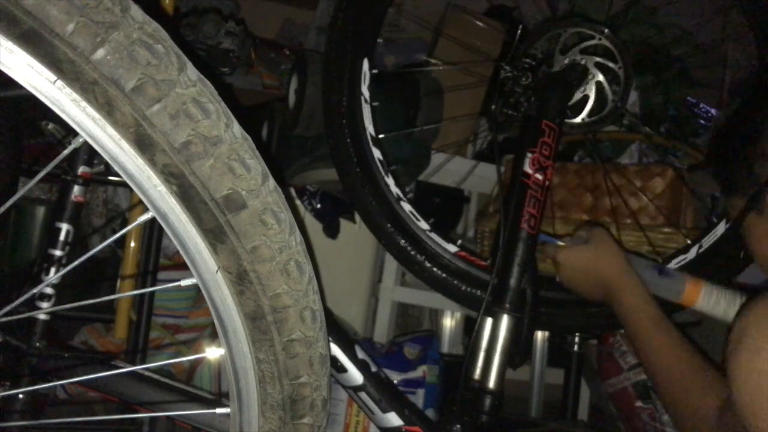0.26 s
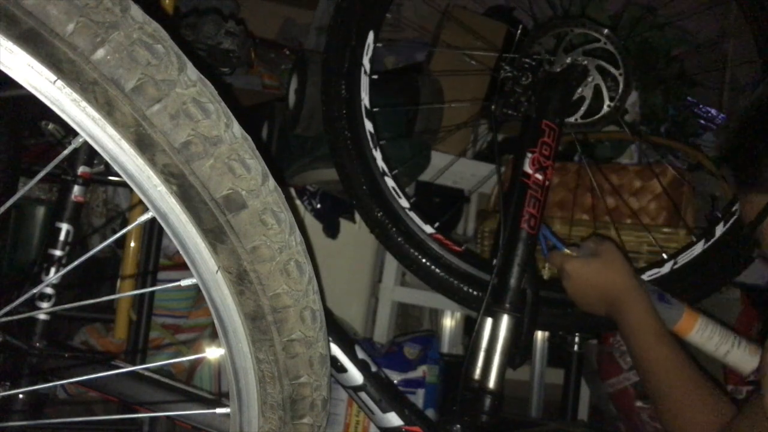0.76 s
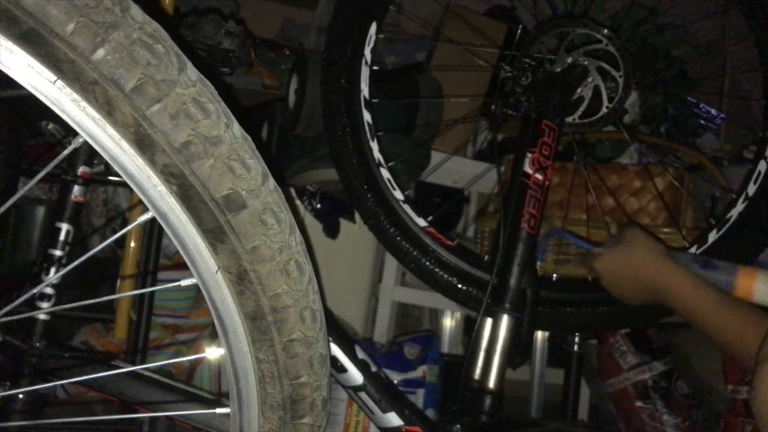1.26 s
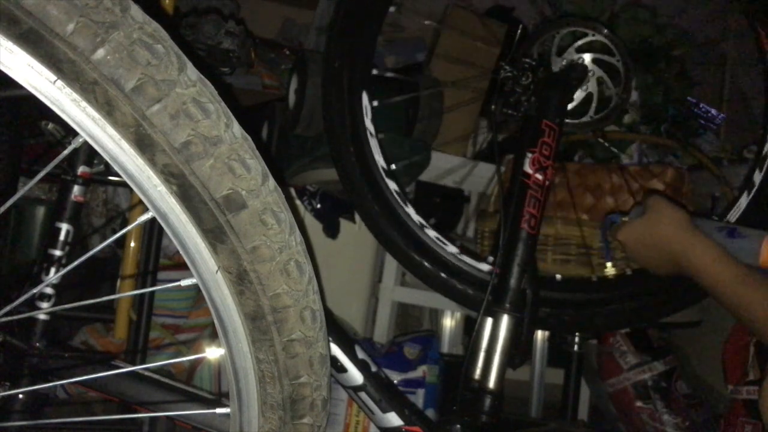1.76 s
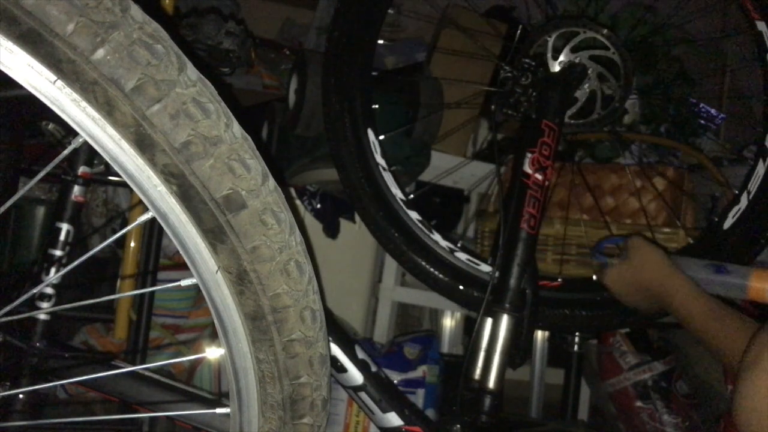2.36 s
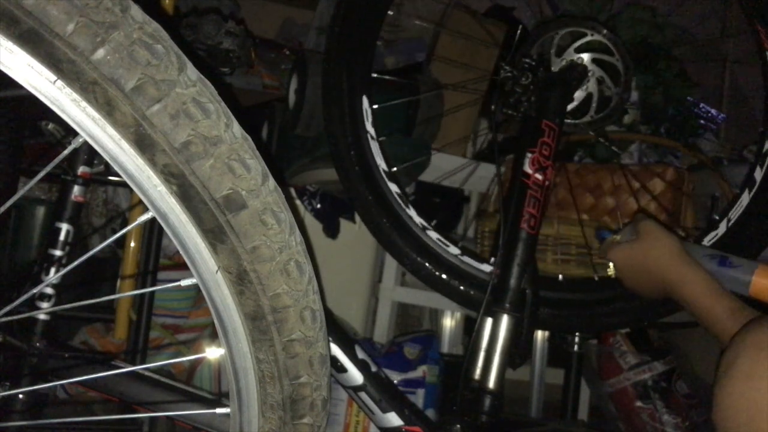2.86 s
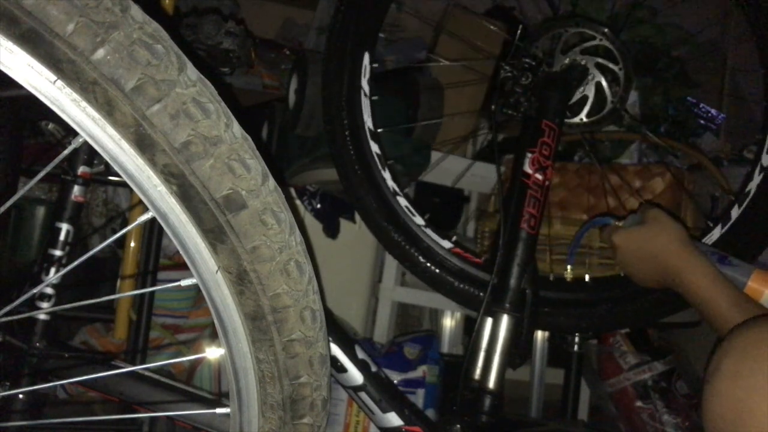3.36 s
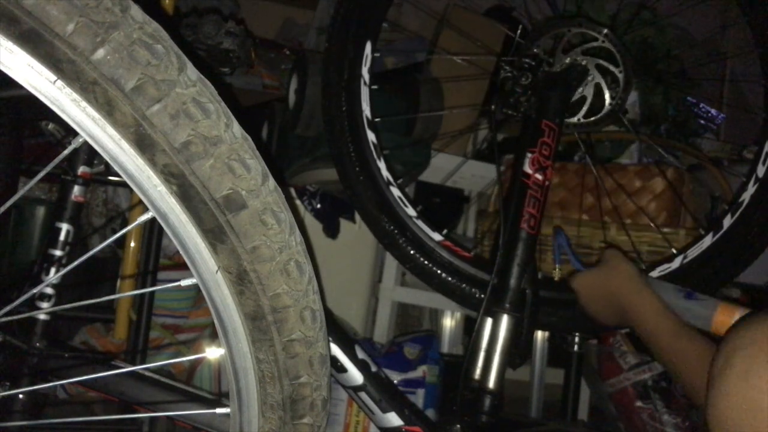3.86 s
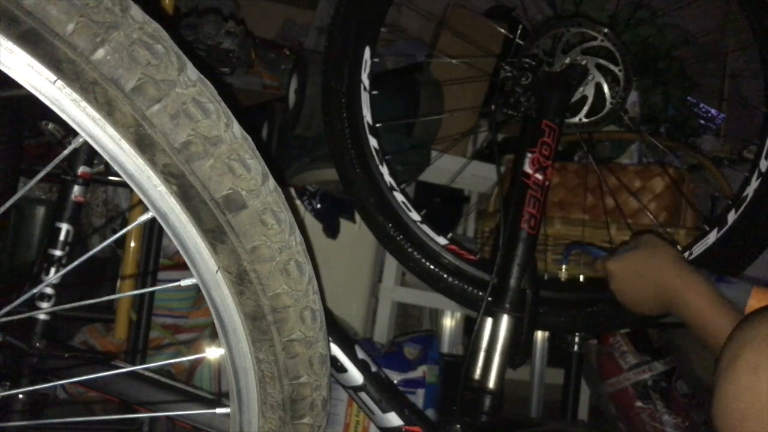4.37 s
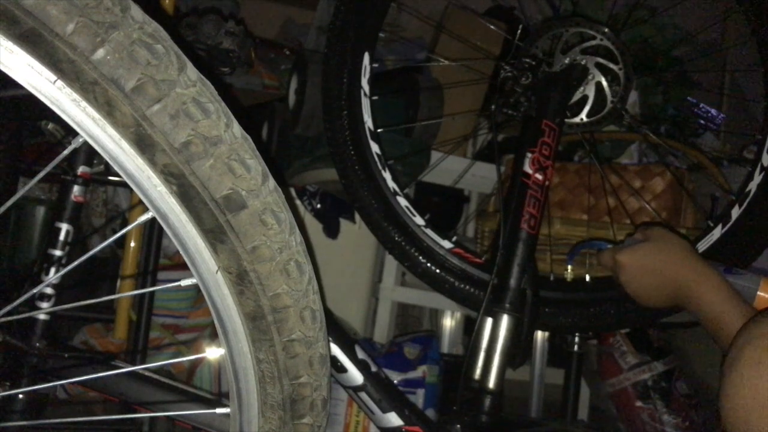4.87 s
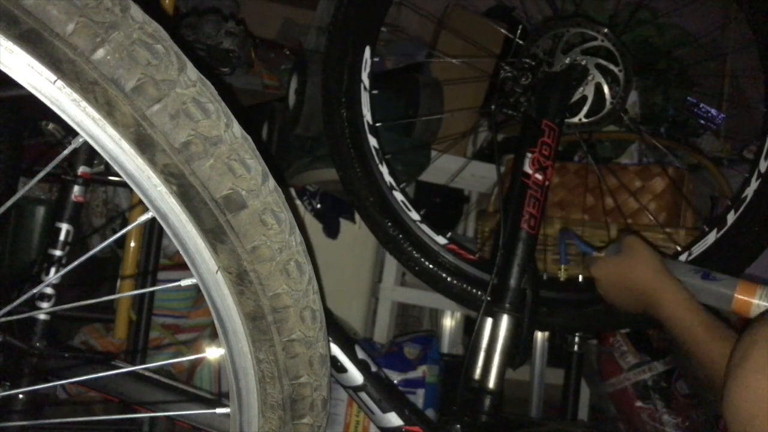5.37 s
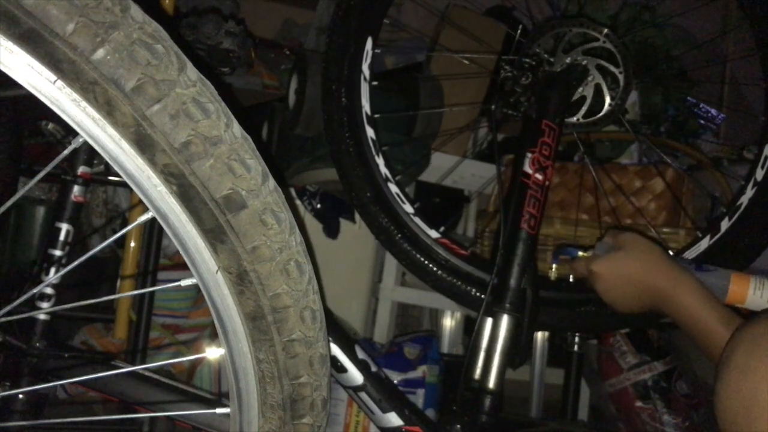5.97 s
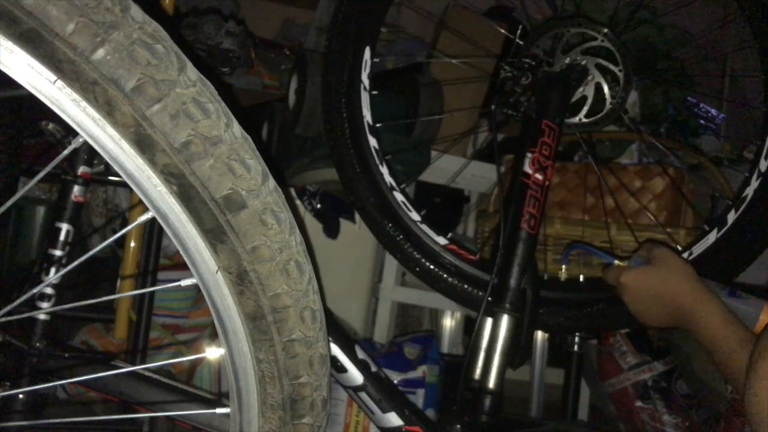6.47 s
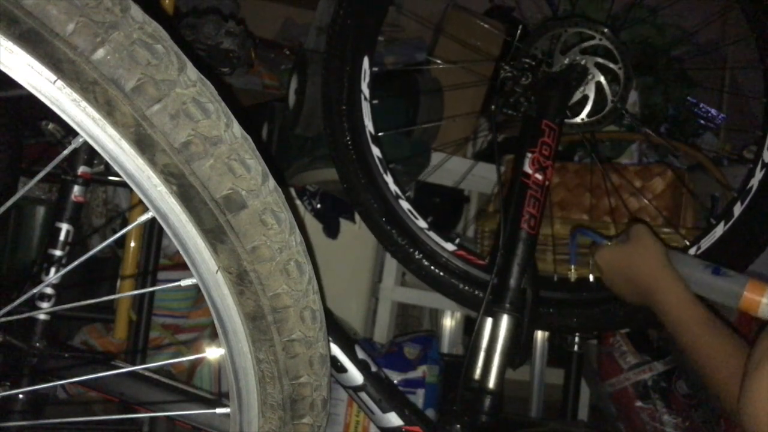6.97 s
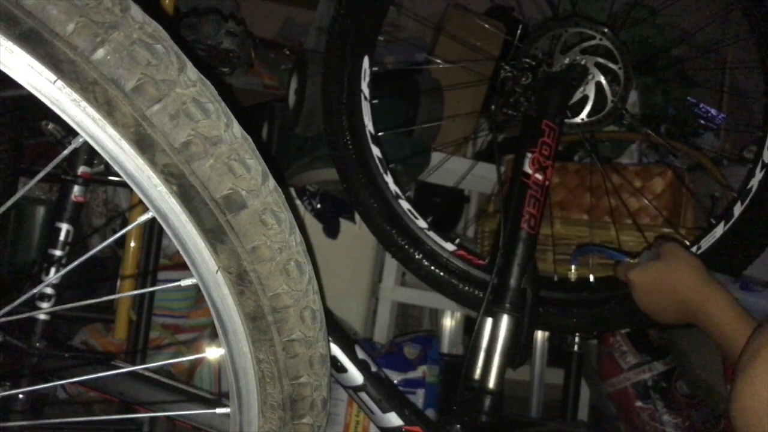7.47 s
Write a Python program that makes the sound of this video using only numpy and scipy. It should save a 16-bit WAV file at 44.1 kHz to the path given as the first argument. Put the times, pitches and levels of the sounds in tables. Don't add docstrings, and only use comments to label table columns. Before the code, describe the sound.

In a small garage with a short ring and a faint low boom of far traffic, a hand pump works close by on a bicycle tyre valve. At 0 s it is already mid-push: hard jerky knocks in the barrel, a short airy drone, then a bright metallic puff by 0.09 s. Air hisses and whistles from 0.16 s as the handle returns; around 0.35 to 0.7 s wind buffets the microphone, fluttering and humming low and hollow, fading by 1.5 s. A slow fizzing pull follows from 1.3 to 2.2 s with small ticks. More stuttering pushes land near 2.5, 3.9, 5.25 and 6.9 s, mostly ending in sharp valve snaps; the third ends more weakly. Between them come thin hiss and fizz, skin rubbing metal and loose-part ticks. Dry lever clicks sound at 4.3 s and in clusters around 6.0 and 6.6 s. A faint last leak runs to about 7.8 s.

```python
import sys
import numpy as np
from scipy import signal
from scipy.fft import rfft, irfft, next_fast_len
from scipy.io import wavfile
from scipy.ndimage import uniform_filter1d, map_coordinates

SR = 44100
rng = np.random.default_rng(int(sys.argv[2]) if len(sys.argv) > 2 else 0)


def to_linear_factor(level_db):
    exponent = np.asarray(level_db, float) / 20
    return 10 ** exponent


def transcribe(u):
    v = np.clip(np.atleast_2d(u).T, -1, 1)
    q = np.round(v * 32767).astype(np.int16)
    wavfile.write(sys.argv[1], SR, q)


N = 340887
STEP = 32
HARD_DB = -15

# [f/Hz, time to fall 60 dB/s]
GARAGE_FADE = [(300, 0.38), (2000, 0.23), (6000, 0.27), (14000, 0.19)]
# [t/s, level/dB]
TRAFFIC_LEVEL = [(1.5, -50), (4.54, -51.5), (4.57, -50), (6.91, -52.5), (7.03, -48), (7.42, -54.5),
                 (7.73, -50.5)]
# [f/Hz, level/dB]
TRAFFIC_COLOUR = [(12, -57), (20, -50.5), (54, 4.5), (80, 5.5), (101, -1.5), (206, -15.5), (400, -20.5),
                  (520, -33), (880, -120)]
# [f/Hz, level/dB]
ROOM_AIR_COLOUR = [(200, -23.5), (650, -3.5), (930, -8), (1800, -13.5), (4000, -15.5), (8000, -16.5),
                   (12000, -21), (15800, -14.5)]
# [t/s, peak
# level/dB, 20 dB rise/s, 20 dB fall/s, dull part level/dB]
STROKES = [(0, -32.5, 0.045, 0.08, -19), (0.299, -49.5, 0.3, 0.21, -8.5), (0.631, -50, .003, 0.048, -15),
           (.662, -54, .003, 0.11, 5), (0.926, -51.5, 0.003, 0.14, -8), (1.416, -53.5, 0.17, 0.068, -10),
           (1.8, -65, 1, 0.63, -5.5), (2.167, -54.5, 0.064, 0.057, 5), (2.353, -56, 0.0026, 0.017, 15.5),
           (2.7, -65, 0.64, 0.04, -8), (2.766, -54.5, 0.017, 0.25, -4), (2.84, -56.5, .1, 0.037, -15),
           (3.1, -64, 0.11, 0.32, -2), (3.594, -64, 0.13, 0.072, -5.5), (3.863, -51, 0.025, 0.036, -10),
           (3.965, -42, 0.044, 0.077, -24), (4.192, -57.5, 0.81, 0.27, -9), (4.66, -66, 0.24, 0.77, -7),
           (5.2, -48, 0.13, 0.14, -2.5), (5.52, -49, 0.13, 0.07, -9), (5.62, -66.5, 0.14, 1.3, -4.5),
           (6.55, -64.5, 0.083, 0.14, -5.5), (6.708, -54, 0.027, 0.12, -6), (6.87, -57, 0.1, 0.44, -0.5),
           (7.17, -56.5, 0.092, 0.27, -31)]
# [f/Hz, level/dB]
SKIN_COLOUR = [(530, -28.5), (900, 0), (3300, -4), (3780, -7), (4340, -6), (4970, -7.5), (8000, -11.5),
               (10400, -18.5), (17600, -120)]
# [f/Hz, level/dB]
PALM_COLOUR = [(120, -8), (250, -7), (700, -2.5), (1200, -17)]
# [t/s, peak level/dB, top level/dB, barrel level/dB]
SNAPS = [(0, -38.5, -8, -21), (0.0616, -22.5, -14, -10), (0.083, -21.5, -9, -6.5),
         (0.0868, -14, -18, -21.5), (2.615, -20.5, -19, -15), (2.6279, -20.5, -10, -6.5),
         (2.630, -17.5, -7.5, -8.5), (3.622, -37, -35, -36), (3.8252, -34.5, -29, -23),
         (4.076, -41, -30, -28), (5.320, -22, -21, -19), (5.3314, -24.5, -13, -3), (5.334, -22, -7.5, -2.5),
         (6.993, -17.5, -16, -11), (6.998, -21.5, -4.5, -23)]
# [f/Hz, level/dB]
JET_COLOUR = [(4000, -30), (5400, 5.5), (7000, 0.5), (9500, 6), (11500, -12.5)]
# [f/Hz, level/dB]
JET_TOP_COLOUR = [(8500, -29.5), (11000, 2), (13500, 0.5), (16500, -1)]
# [f/Hz, width/Hz, level/dB]
VALVE_MODES = [(1400, 37, -9.5), (2650, 62, -8), (4050, 36, -4), (5572, 54, 5), (6420, 36, 4.5),
               (7070, 81, 4.5), (8700, 45, 1.5), (10000, 68, 4.5), (11140, 54, -3), (11700, 54, -1),
               (13000, 80, -3.5)]
# [t/s, peak level/dB, edge level/dB, barrel pitch f/Hz]
JERKS = [(.0075, -16.5, -13, 3800), (0.03, -15, -18, 4630), (2.349, -34, -30, 2430),
         (2.478, -36, -36, 2650), (2.4955, -28.5, -34, 2620), (2.514, -16, -14.5, 3350),
         (2.548, -17, -11.5, 2960), (2.5754, -13.5, -19, 4200), (3.801, -38.5, -30, 1800),
         (3.851, -34.5, -3, 6300), (3.872, -16, -15, 2530), (3.9013, -14, -13.5, 3880),
         (3.9288, -18.5, -11, 5830), (5.212, -13, -15, 2520), (5.235, -12.5, -19, 2530),
         (5.2543, -14.5, -15, 1970), (5.277, -14, -16, 4050), (6.702, -44, -16, 1400),
         (6.711, -39, -17, 1400), (6.880, -15, -13, 3670), (6.9078, -14, -17, 4600),
         (6.936, -16, -13.5, 2040), (6.983, -16.5, -17, 3550)]
# [f/Hz, level/dB]
BARREL_COLOUR = [(400, -11), (750, -4), (1250, 0), (1700, 2.5), (2510, 7.5), (4560, 2), (4950, 4),
                 (5580, -19), (6350, -0.5), (9000, -12), (11700, -48.5), (19800, -120)]
# [f/Hz, width/Hz, level/dB]
BARREL_MODES = [(700, 140, -11.5), (1300, 110, -6), (1880, 74, -10), (2250, 50, 4.5), (2480, 44, 3),
                (2610, 76, 4), (3550, 200, -1.5), (4390, 120, 9.5), (5570, 490, 3.5)]
# [f/Hz, level/dB]
EDGE_COLOUR = [(5000, -11), (8000, -2.5), (12500, -6.5), (16500, -10.5)]
# [f/Hz, level/dB]
THUD_COLOUR = [(100, -14.5), (220, 3.5), (480, -12), (1100, 0), (2000, -26)]
# [t/s, peak level/dB, pitch f/Hz]
KNOCKS = [
    (.0075, -41, 700),
    (2.351, -38.5, 950),
    (2.352, -48, 200),
    (2.407, -53.5, 700),
    (2.52, -34.5, 890),
    (2.578, -32.5, 820),
    (2.591, -41, 700),
    (4.076, -44, 189),
]
# [f/Hz, level/dB]
KNUCKLE_COLOUR = [(80, 1.5), (190, 1.5), (400, -5.5), (900, -29.5)]
# [t/s, level/dB, hold/s, upper mode f/Hz]
DRONES = [
    (0.034, -39, 0.039, 1490),
    (2.582, -39, 0.03, 1820),
    (3.918, -42, 0.046, 1800),
    (5.271, -37.5, 0.042, 1510),
    (6.944, -37, 0.038, 1810),
]
# [t/s, peak level/dB, pitch f/Hz]
TICKS = [(0.088, -17, 3000), (.496, -29, 3400), (1.339, -42.5, 1920), (1.351, -36.5, 3620),
         (1.3961, -41, 1980), (1.4057, -35, 2240), (1.418, -31, 3400), (1.423, -33, 2350),
         (1.452, -31, 4500), (1.6924, -42, 3500), (2.147, -45, 2480), (2.162, -57, 3000),
         (2.317, -52, 4000), (2.342, -52, 4500), (2.3493, -22, 2530), (2.3494, -29, 2450),
         (2.7618, -34.5, 2930), (2.789, -43, 1850), (2.828, -40, 4300), (2.842, -39, 3080),
         (2.856, -47, 930), (3.175, -45, 5600), (4.0758, -26.5, 6700), (4.137, -45, 1880),
         (4.255, -42.5, 1470), (4.256, -46, 2600), (5.134, -40, 8500), (5.136, -36, 3500),
         (5.1405, -45, 8000), (5.156, -40, 8500), (5.167, -41, 9800), (5.180, -38, 12500),
         (5.190, -40, 8500), (5.471, -36, 2920), (5.485, -42, 1800), (5.499, -43.5, 730),
         (5.519, -42, 1330), (5.531, -58, 1960), (5.55, -40, 2000), (6.343, -43.5, 10440),
         (6.554, -52, 12000), (6.585, -44, 10000), (6.588, -46, 10000), (7.1732, -35, 2030),
         (7.208, -44, 1980), (7.261, -46, 1230), (7.331, -47, 1250)]
# [start t/s, end t/s, start flow level/dB, end flow level/dB, fizz over hiss level/dB]
PULLS = [
    (.16, 0.47, -55, -51, -7.5),
    (0.642, 1.2, -66, -81, -2),
    (1.338, 2.182, -63, -73, 2),
    (2.828, 3.65, -58, -74.5, 3),
    (4.107, 5.018, -60.5, -66, 2),
    (5.514, 6.21, -57, -57.5, -0.5),
    (7.208, 7.792, -67, -79, 4.5),
]
# [t/s, hiss level/dB]
BLOW_OFFS = [
    (.15, -53),
    (2.75, -52.5),
    (3.62, -69),
    (4.0, -56),
    (5.45, -52.5),
    (7.1, -55),
    (7.27, -59),
]
# [f/Hz, level/dB]
HISS_COLOUR = [(2650, -29), (4500, -1), (4960, -19), (5230, -3.5), (5620, -5.5), (6370, 1), (6560, 1),
               (8250, -4.5), (8990, 2.5), (10600, -7.5), (13800, -24), (22000, -120)]
# [f/Hz, level/dB]
FIZZ_COLOUR = [(9000, -12.5), (10600, -13), (11200, -7.5), (12300, -4), (13300, -3.5), (14000, -6.5),
               (15000, -11.5), (15800, -11)]
# [f/Hz, level/dB]
WHISTLE_COLOUR = [(1500, -16), (2800, -15.5), (3400, -4), (3900, -7), (4700, -21), (6000, -65)]
# [t/s, level/dB]
DRAUGHT_LEVEL = [
    (0.346, -20),
    (.44, -37.5),
    (.475, -42),
    (.515, -26),
    (.56, -29),
    (.62, -35),
    (.9, -42.5),
    (1.35, -42),
    (1.51, -59),
]
# [t/s, peak level/dB, flutter level/dB, rush level/dB under the peak, 20 dB fall/s]
EDDIES = [(.346, -26.5, -27, -35, -0.0342), (0.356, -29.5, -2.5, -3, 0.11), (0.385, -43, 7, -1, 0.1),
          (0.416, -35, 7, -1.5, 0.117), (0.483, -28, -4, -34, 0.0648), (0.499, -27.5, -2, -22.5, 0.0727),
          (.512, -38, -3.5, -41, 0.16), (.533, -31.5, -22, -47, 0.0355), (.64, -48.5, -25, -10, 0.38),
          (0.667, -39, -3.5, -34, 0.07), (0.674, -38.5, -3.5, -26, 0.1737),
          (0.871, -49.5, -10.5, -18, 0.43), (.928, -57, -13, -22, 0.74), (1.191, -50.5, -14, -31, 0),
          (1.32, -65, 12, 8, 0), (1.413, -59.5, -15, 19, -0.42)]
# [f/Hz, level/dB]
WIND_BOOM_COLOUR = [(15, -46.5), (25, -38), (39, -14.5), (53, 7.5), (64, -12), (76, -5), (100, -2.5),
                    (135, -7.5), (170, -38), (290, -120)]
# [f/Hz, level/dB]
BUFFET_COLOUR = [(59, -12), (100, -1.5), (130, 5.5), (165, 6.5), (210, 6.5), (259, -4.5), (334, -0.5),
                 (399, -10.5), (462, -10.5), (700, -22.5), (910, -77), (1540, -120)]
# [f/Hz, level/dB]
FLUTTER_COLOUR = [(290, 2), (500, -4.5), (701, 0), (891, 3), (1900, -8), (3000, -20.5), (3900, -17.5),
                  (6600, -120)]
# [f/Hz, level/dB]
RUSH_COLOUR = [(1470, -13.5), (2500, 3), (6350, 2), (10600, -8), (15000, -4), (16100, -25), (16500, -59)]
# [f/Hz, width/Hz, level/dB]
HOLLOW_MODES = [(354, 43, -1), (458, 18, -2), (594, 23, -2), (798, 47, -5), (890, 30, -5), (1055, 48, -9)]
# [t/s, level/dB, hold/s, 20 dB fall/s, overtone level/dB]
SURGES = [
    (0.354, -40.5, 0.0067, 1, -9),
    (0.371, -24, 0.01, -0.06, -14),
    (0.424, -22.5, 0.017, 0.15, -28),
    (0.505, -21.5, 0.012, 0.18, -11.5),
    (0.686, -38, 0.018, 0.4, -21),
]
# [t/s, peak level/dB]
CLICKS = [(4.322, -40), (5.9607, -42), (5.976, -49), (6.008, -39), (6.544, -45.5), (6.554, -44),
          (6.568, -48), (6.584, -39.5), (6.588, -43), (6.621, -49), (6.639, -52)]
# [f/Hz, level/dB]
MIC_RESPONSE = [(15720, 0), (15880, -28.5), (17000, -40.5)]


def unit(x):
    return x / np.sqrt(np.mean(x ** 2) + 1e-20)


def along(points, hz):
    f, v = np.transpose(points)
    return np.interp(np.log(hz + 1), np.log(f + 1), v)


def curve(rows):
    s, values = np.transpose(rows)
    return np.interp(np.arange(N) / SR, s, values)


def wobble(rate):
    knots = rng.standard_normal(int(N / SR * 400) + 4)
    return map_coordinates(knots, [np.arange(N) * min(rate, 400) / SR])


def coloured(x, spectrum):
    m = next_fast_len(len(x) + 2048)
    closed = [(spectrum[0][0] / 2, -90), *spectrum, (spectrum[-1][0] * 2, -90)]
    gain = to_linear_factor(along(closed, np.fft.rfftfreq(m, 1 / SR)))
    return irfft(rfft(x, m) * unit(gain), m)[:len(x)]


def ringing(x, modes):
    m = next_fast_len(len(x) + SR // 20)
    f = np.fft.rfftfreq(m, 1 / SR)
    response = 0
    for k, (hz, width, db) in enumerate(modes):
        mode = 1j * f * width / (hz * hz - f * f + 1j * f * width)
        response = response + (-1) ** k * to_linear_factor(db) * mode
    return irfft(rfft(x, m) * response / np.sqrt(np.mean(abs(response) ** 2)), m)[:len(x)]


def scattered(modes, spread_db):
    return [(hz, width, db + spread_db * rng.standard_normal()) for hz, width, db in modes]


def noise(spectrum, grain_db, rate):
    flicker = to_linear_factor(grain_db * wobble(rate))
    return unit(coloured(rng.standard_normal(N) * flicker, spectrum))


def swell(s, db, rise, fall, hold=0, slope_db=0):
    t = np.arange(0, N + STEP, STEP) / SR - s
    ramp = np.minimum(t, 0) / max(rise, .003) - np.maximum(t - hold, 0) / max(fall, .003)
    return to_linear_factor(db + 20 * ramp + slope_db * np.clip(t / max(hold, 1e-3), 0, 1))


def fine(gain):
    return np.interp(np.arange(N), np.arange(len(gain)) * STEP, gain)


def spurt(u, steep):
    z = rfft(u ** max(steep, .1) * np.exp(-2 * u) * rng.standard_normal(u.shape))
    even = irfft(z / np.sqrt(uniform_filter1d(abs(z) ** 2, size=250) + 1e-12), u.shape[1])
    even[:, u.shape[1] // 2:] = 0
    return even / np.linalg.norm(even, axis=1, keepdims=True)


def garage(count, length, gap):
    hz, t, z = signal.stft(rng.standard_normal((count, length)), SR, nperseg=128)
    fading = z * to_linear_factor(-60 * t / along(GARAGE_FADE, hz)[:, None])
    tail = signal.istft(fading, SR, nperseg=128)[1][:, :length]
    tail *= 1 - np.exp(-(np.arange(length) / SR / max(gap, .001)) ** 2)
    return tail / np.linalg.norm(tail, axis=1, keepdims=True)


def bursts(events, voice, wet_db, bright_wet_db=0, steep=2, lag=0, gap=0.0036):
    out = np.zeros(N + SR)
    t = np.arange(SR // 4) / SR
    lags = np.array([[lag], [0], [lag]])
    wet = to_linear_factor(wet_db + np.array([[0], [bright_wet_db], [0]]))
    for s, db, high_db, low_db, length, *pitch in events:
        u = np.maximum(t - lags, 0) / max(length, 2e-4) / [[1], [.5], [1]]
        blow = spurt(u, steep) + wet * garage(count=3, length=len(t), gap=gap)
        heard = np.sqrt(length * SR) * blow
        out[round(s * SR):][:len(t)] += to_linear_factor(db) * voice(heard, high_db, low_db, *pitch)
    return out[:N]


def background():
    boom = to_linear_factor(curve(TRAFFIC_LEVEL) - 1.67) * noise(TRAFFIC_COLOUR, grain_db=1.0, rate=13)
    return boom + to_linear_factor(-66.5) * noise(ROOM_AIR_COLOUR, grain_db=-1.0, rate=30)


def rubbing_palms():
    hold_db = -83.5
    strokes = np.array([swell(*row[:-1]) for row in STROKES])
    rub = strokes.sum(axis=0) + to_linear_factor(hold_db)
    dull = to_linear_factor([row[-1] for row in STROKES]) @ strokes + to_linear_factor(hold_db + 2.0)
    palm = to_linear_factor(-1.44) * fine(dull) * noise(PALM_COLOUR, grain_db=3.0, rate=77)
    return to_linear_factor(0.5) * fine(rub) * noise(SKIN_COLOUR, grain_db=2.0, rate=150) + palm


def puff(spurts, top_db, barrel_db, ring_db):
    jet = to_linear_factor(-5.0) * coloured(spurts[0], JET_COLOUR)
    ring = to_linear_factor(ring_db) * ringing(spurts[0], scattered(VALVE_MODES, spread_db=2.0))
    top = to_linear_factor(top_db + 4.5) * coloured(spurts[1], JET_TOP_COLOUR)
    return jet + ring + top + to_linear_factor(barrel_db - 4.0) * coloured(spurts[2], BARREL_COLOUR)


def valve_snaps():
    events = []
    for s, db, top_db, barrel_db in SNAPS:
        over_db = db - HARD_DB
        length_s = max(.001, 0.0042 * to_linear_factor(0.26 * over_db))
        ring_db = -4 + 0.27 * min(over_db, 0)
        events.append((s, db, top_db, barrel_db, length_s, ring_db))
    return bursts(events, puff, wet_db=-0.5, bright_wet_db=1.5, steep=0.81, gap=0.0028)


def slip(spurts, edge_db, thud_db, pitch):
    column = to_linear_factor(-13.0) * ringing(spurts[0], [(pitch, .13 * pitch, 0)])
    body = to_linear_factor(-9.5) * coloured(spurts[0], BARREL_COLOUR)
    tube = to_linear_factor(-10.5) * ringing(spurts[0], scattered(BARREL_MODES, spread_db=3.0))
    edge = to_linear_factor(edge_db - 3.0) * coloured(spurts[1], EDGE_COLOUR)
    return body + tube + column + edge + to_linear_factor(thud_db + 2.0) * coloured(spurts[2], THUD_COLOUR)


def seal_slips():
    events = []
    for s, db, edge_db, hz in JERKS:
        thud_db = -26.5 + 0.66 * (HARD_DB - db)
        events.append((s, db, edge_db, thud_db, 0.0021, hz))
    return bursts(events, slip, wet_db=-2.0, bright_wet_db=1.5, lag=.0006, gap=0.0053)


def small_part(spurts, edge_db, thud_db, pitch, spread=.4):
    narrow = ringing(spurts[0], [(pitch, spread * pitch, 0)])
    click = to_linear_factor(-12.5) * ringing(narrow, [(pitch, 1.2 * pitch, 0)])
    edge = to_linear_factor(edge_db - 3.5) * coloured(spurts[1], EDGE_COLOUR)
    return click + edge + to_linear_factor(thud_db - 7.5) * coloured(spurts[2], KNUCKLE_COLOUR)


def knuckle_knocks():
    edge_db, thud_db, length_s = -40, -17, 0.0014
    events = [(s, db, edge_db, thud_db, length_s, hz) for s, db, hz in KNOCKS]
    return bursts(events, small_part, wet_db=-5.0)


def drone():
    low_hz, width_hz, rise_s, fall_s = 1100, 340, 0.072, 0.044
    out = np.zeros(N)
    for s, db, hold, hz in DRONES:
        span = slice(max(round((s - .15) * SR), 0), round((s + .25) * SR))
        hiss = rng.standard_normal(span.stop - span.start)
        air = ringing(hiss, [(low_hz, width_hz, -1.5), (hz, width_hz, 0)])
        out[span] += fine(swell(s, db, rise_s, fall_s, hold))[span] * air
    return out


def fitting_ticks():
    edge_db, thud_db, length_s = -29.5, -23, 0.0013
    events = [(s, db, edge_db, thud_db, length_s, hz) for s, db, hz in TICKS]
    return bursts(events, small_part, wet_db=-4.5)


def leaking_air():
    rise_s, stop_s = 0.12, 0.041
    fizz_swell_db, fizz_swell_share, fizz_sag_s = 7.5, 0.64, 2.9
    flow = fizz = reed = 0
    for start, end, db, end_db, over_db in PULLS:
        span, slope_db = end - start, end_db - db
        flow = flow + swell(start, db, rise_s, stop_s, span, slope_db)
        steady = swell(start, db + over_db - fizz_swell_db, rise_s, stop_s, span, slope_db)
        fizz = fizz + steady * swell(start, 0, 99, fizz_sag_s, fizz_swell_share * span, fizz_swell_db)
        reed_db = -68 + 0.99 * (db + 61.0)
        reed = reed + swell(start, reed_db, rise_s, stop_s, span, -3.0)
    blow = sum(swell(s, db, 0.12, 0.11) for s, db in BLOW_OFFS) + to_linear_factor(-76)

    turn = np.pi / 4 + 0.39 * wobble(2.3)
    darker = [(hz * 0.94, db) for hz, db in FIZZ_COLOUR]
    drifting = np.cos(turn) * noise(FIZZ_COLOUR, grain_db=-0.5, rate=74)
    drifting += np.sin(turn) * noise(darker, grain_db=1.5, rate=89)

    hissing = to_linear_factor(-3.5 + 1.5 * wobble(5.7)) * fine(flow + blow) * noise(HISS_COLOUR, grain_db=1.0, rate=220)
    fizzing = to_linear_factor(2.5 + 1.1 * wobble(4.4)) * fine(fizz + to_linear_factor(-7.5) * blow) * drifting
    whistling = fine(reed + to_linear_factor(-14.0) * blow) * noise(WHISTLE_COLOUR, grain_db=1.5, rate=290)
    return hissing + fizzing + whistling


def draught():
    strength_db = curve([(.32, -80), *DRAUGHT_LEVEL, (1.7, -99)])
    eddies = np.array([swell(s, db, 0.016, fall) for s, db, _, _, fall in EDDIES])
    buffet_gain = fine(eddies.sum(axis=0)) + to_linear_factor(strength_db - 15.5)
    buffet = buffet_gain * noise(BUFFET_COLOUR, grain_db=2.5, rate=21.7)
    boom = to_linear_factor(strength_db - 4.0) * noise(WIND_BOOM_COLOUR, grain_db=0.5, rate=9.3)

    hollow = to_linear_factor(-2.0) * unit(ringing(rng.standard_normal(N), HOLLOW_MODES))
    flutter_gain = fine(to_linear_factor([row[2] - 4.5 for row in EDDIES]) @ eddies)
    flutter = flutter_gain * (noise(FLUTTER_COLOUR, grain_db=-2.5, rate=81) + hollow)
    rush_gain = fine(to_linear_factor([row[3] - 1.5 for row in EDDIES]) @ eddies)
    rush = rush_gain * noise(RUSH_COLOUR, grain_db=-0.5, rate=350)
    return buffet + boom + to_linear_factor(2.1 * wobble(44.43)) * (flutter + rush)


def hollow_hum():
    hum_hz, overtone_hz, wander = 75.8, 208.7, 0.023
    t = np.arange(N) / SR
    out = np.zeros(N)
    chances = rng.uniform(-0.93, 1, (len(SURGES), 3))
    for (s, db, hold, fall, over_db), (a, b, off) in zip(SURGES, chances):
        turn = 2 * np.pi * (1 + wander * off) * (t - s)
        tone = np.sin(hum_hz * turn + np.pi * a)
        overtone = to_linear_factor(over_db) * np.sin(overtone_hz * turn + np.pi * b)
        out += fine(swell(s, db + 1.0, 0.03, fall, hold)) * (tone + overtone)
    return out


def lever_clicks():
    edge_db, thud_db, length_s, pitch_hz, spread = -14, -38, 0.0017, 3820, 0.24
    events = [(s, db, edge_db, thud_db, length_s, pitch_hz, spread) for s, db in CLICKS]
    return bursts(events, small_part, wet_db=-17, gap=.005)


def scene():
    hands = rubbing_palms() + knuckle_knocks() + fitting_ticks() + lever_clicks()
    pump = valve_snaps() + seal_slips() + drone() + leaking_air()
    wind = draught() + hollow_hum()
    return (background() + hands + pump + wind)[None]


def low_pass(x):
    return signal.sosfilt(signal.butter(12, 16990, fs=SR, output="sos"), x)


def record(dry):
    m = next_fast_len(N)
    response = to_linear_factor(along(MIC_RESPONSE, np.fft.rfftfreq(m, 1 / SR)))
    heard = irfft(rfft(dry, m) * response, m)[:, :N]
    return low_pass(heard)


dry = scene()
out = record(dry)
transcribe(out)
```